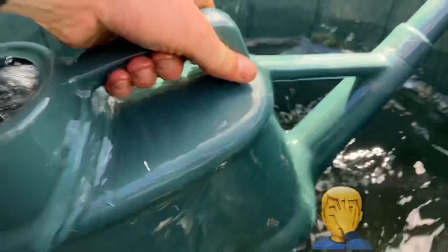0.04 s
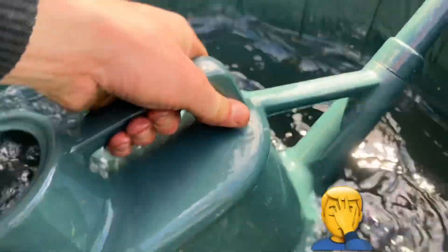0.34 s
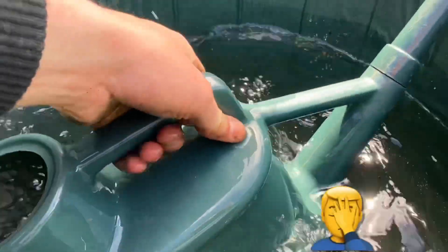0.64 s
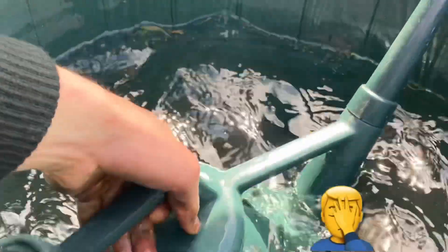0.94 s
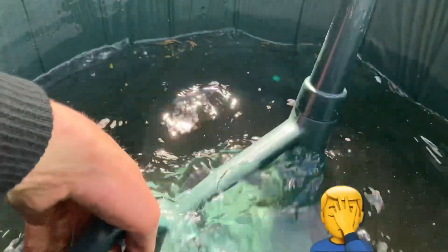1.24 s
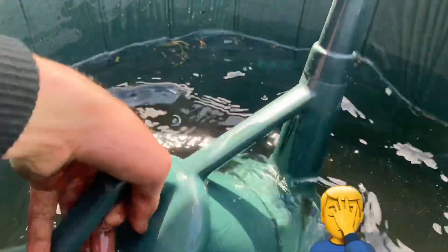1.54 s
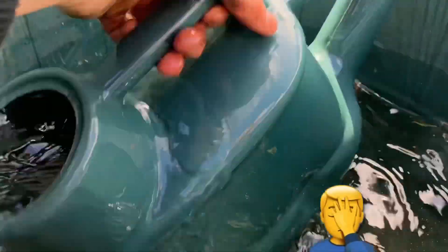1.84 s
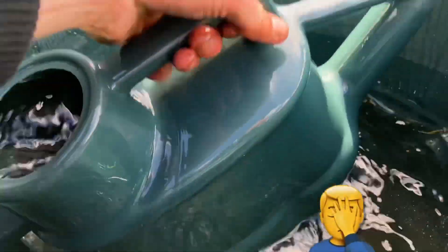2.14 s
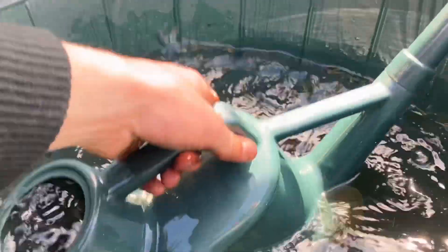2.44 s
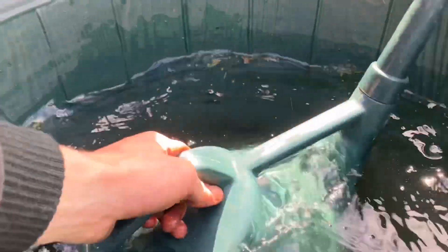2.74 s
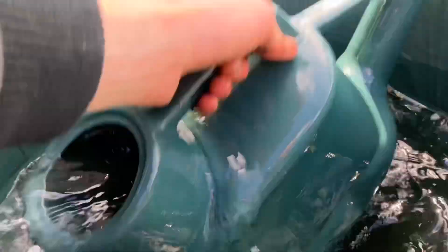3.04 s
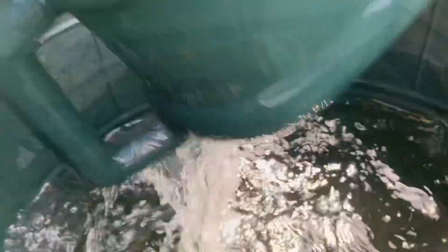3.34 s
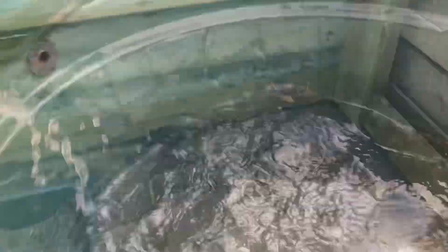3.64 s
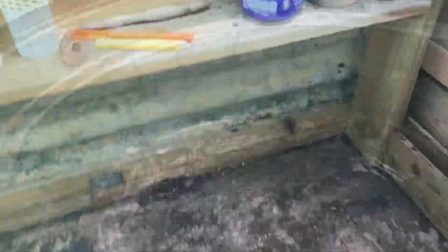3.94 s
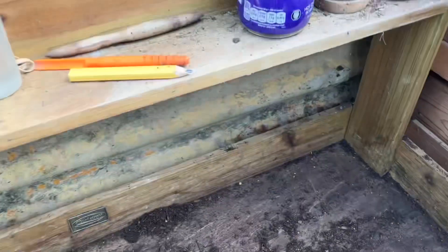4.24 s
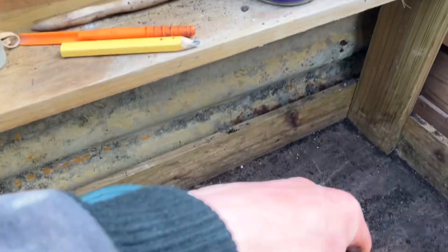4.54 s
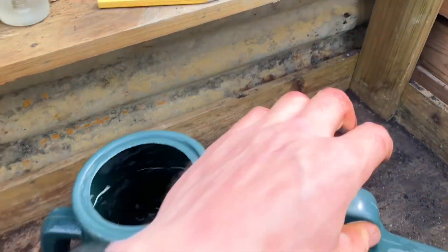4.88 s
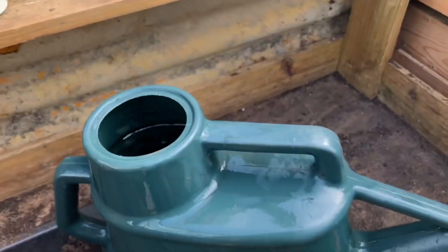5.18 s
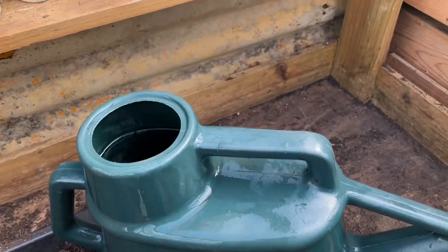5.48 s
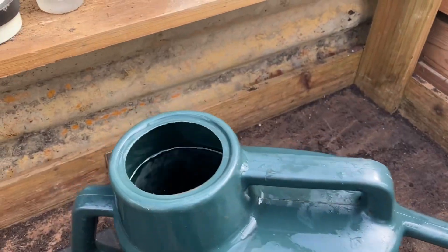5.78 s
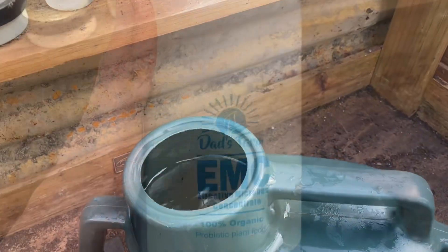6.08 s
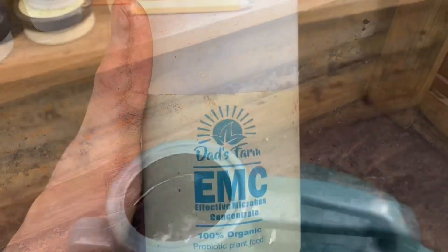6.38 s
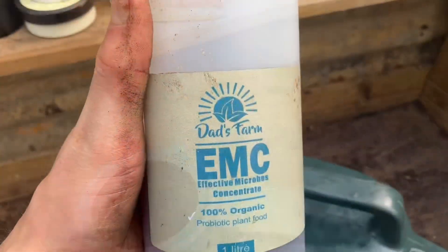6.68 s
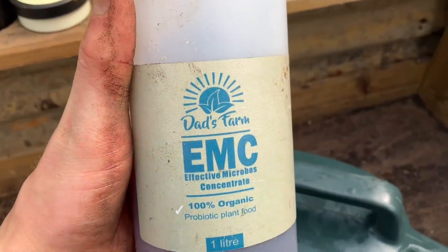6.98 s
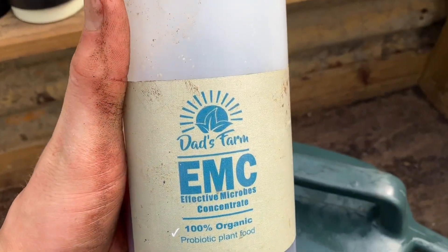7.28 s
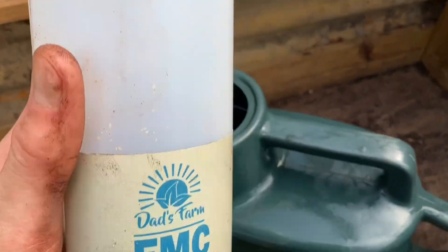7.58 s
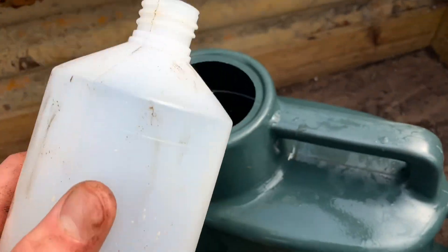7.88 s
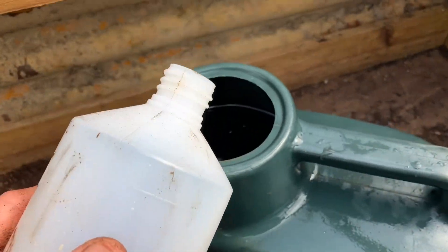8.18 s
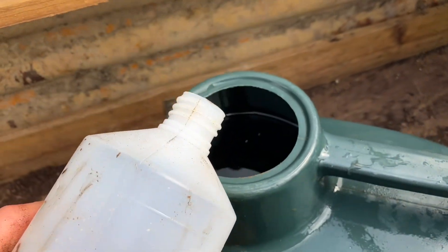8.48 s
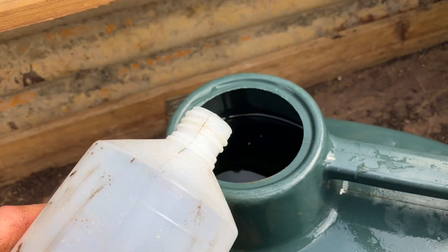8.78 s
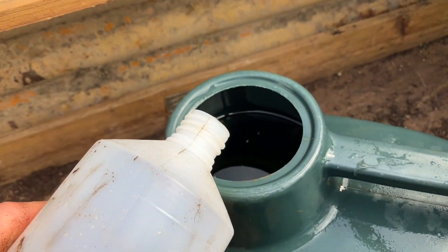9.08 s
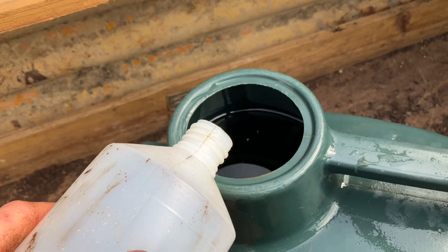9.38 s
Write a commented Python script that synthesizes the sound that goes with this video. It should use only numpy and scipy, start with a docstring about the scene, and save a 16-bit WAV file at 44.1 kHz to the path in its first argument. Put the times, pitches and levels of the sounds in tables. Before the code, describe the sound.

A plastic watering can plunges into a water butt right at the start, close by, with a splash and a deep gulp of air. Water keeps slapping, bubbling and trickling, and drops tick on the plastic. A second strong plunge comes at about 1.7 seconds and a third surge at 3, with more gurgles and sharp drips. The water fades away around 4 seconds. At 4.3 the full can lands on soil with a dull thud and a brief low slop inside. Quieter hollow knocks follow at about 4.8, 5.1 and 5.6, with two tiny ones just after 6, amid hand rubbing and sleeve rustle. The rest is very quiet: a bottle is handled softly around 7.6 and 9 seconds, and distant jackdaws give about six short, very faint calls between 6.8 and 8.5. A low, soft outdoor rumble runs underneath throughout.

```python
"""Water splashes, gulps air and drips as a plastic watering can is dunked three times in a water butt. The full
can thuds onto soil, slops and knocks; a hand and sleeve rub and swish over its plastic. Jackdaws call far off
over a low outdoor rumble; two closely spaced microphone ports pick it all up. Water is ringing bubbles and
noise bursts, the can is damped wall modes, the rustle is tiny slips, and each call is a harmonic stack through
a throat resonance."""
import sys
import numpy as np
from scipy import signal
from scipy.fft import rfft, irfft, next_fast_len
from scipy.io import wavfile
from scipy.ndimage import map_coordinates

SR = 44100
rng = np.random.default_rng(int(sys.argv[2]) if len(sys.argv) > 2 else 0)


def store_pcm(level_fs):
    """Save levels as 16-bit WAV."""
    pcm = np.round(np.clip(level_fs, -1, 1) * 32767).astype(np.int16)
    wavfile.write(sys.argv[1], SR, np.atleast_2d(pcm).T)


N = 419832

# can plunged, nudged, lifted out: (time [s], length [s], relative bubbling [dB], relative spray [dB])
SURGES = [(0.0, 0.31, -26.5, -35.5), (1.741, 0.33, -26.5, -36.5), (2.482, 0.041, -42.5, -52),
          (3.021, 0.27, -29, -35), (3.424, .025, -35.5, -43), (3.516, 0.07, -38, -42),
          (3.757, 0.067, -53, -51.5)]
# spectrum of thrown spray: (frequency [Hz], level [dB])
SPRAY_SPECTRUM = [(500, -39), (2000, -8), (4000, -13.5), (5500, -9), (11000, -2), (16000, -4)]
# spectrum of rubbed plastic: (frequency [Hz], level [dB])
RUB_SPECTRUM = [(100, 0), (350, -10), (430, 1), (530, 1), (700, -5.5), (1600, -10), (8000, -29.5)]
# spectrum of cloth swish and contact ticks: (frequency [Hz], level [dB])
SWISH_SPECTRUM = [(500, -5.5), (2000, 0.5), (12000, -7), (16000, -7)]

DROPLET_LOW_HZ, DROPLET_HIGH_HZ, DROPLET_CYCLES = 2413, 16300, 33
MIST_DB = -9.5  # finest spray, relative to the droplets


def churn(waves):
    """One patch of water heaves, folds in bubbles and throws spray; in lulls it follows the waves."""
    # spectrum of bubbles and foam: (frequency [Hz], level [dB])
    bubbling_spectrum = [(150, -4), (350, -10.5), (700, -5), (2100, -0.5), (3600, -0.5), (7000, -5.5),
                         (12000, -49)]
    # slow waves settle, then the lifted can stirs them: (time [s], level [dB])
    heave_levels = [(1.3, -45), (1.5, -51.5), (2.9, -53), (3.1, -46)]
    _, _, bubbling_levels, spray_levels = np.transpose(SURGES)
    bubbling_db = surge_db(bubbling_levels, fall_db_per_s=131)
    spray_db = surge_db(spray_levels, fall_db_per_s=70.5)
    busy = np.clip((bubbling_db + 45) / 12, 0, 1)  # 0 in a lull, 1 in a surge
    droplets = swarm(200, DROPLET_LOW_HZ, DROPLET_HIGH_HZ, DROPLET_CYCLES,
                     spread_db=5, samples=800, rise=.1)
    clump_db = np.clip(-.3 * (spray_db + 23.5), 0, 6)  # droplets bunch in the lulls
    droplets *= amp(clump_db * (np.minimum(wobble(25), 1.8) - 1.6))
    foam = amp(-8.5) * noise(bubbling_spectrum)
    mist = amp(MIST_DB) * rng.standard_normal(N)
    breaking = amp(2.4 * wobble(35))
    bubbles = filtered(folds(busy), lambda hz: amp(along(bubbling_spectrum, hz)))
    bubbling = breaking * (bubbles + foam) * amp(bubbling_db - 6 + 1.5 * (busy - .5))
    spray = coloured(breaking * (droplets + mist), SPRAY_SPECTRUM) * amp(spray_db - 1)
    slosh = amp(3 * (1 - busy) * (np.minimum(waves, 1) - 1))
    heave_db = np.interp(np.arange(N) / SR, *np.transpose(heave_levels)) + water_fade_db()
    return amp(heave_db) * low_waves() + slosh * (bubbling + spray)


def surge_db(levels_db, fall_db_per_s):
    """Each surge rises, holds and collapses into a run-off that trickles on, then stops."""
    rise_s, runoff_s = .031, 1.28
    t, power = np.arange(N) / SR, 1e-12
    for (start_s, length_s, *_), db in zip(SURGES, levels_db):
        since_s = np.maximum(t - start_s - length_s, 0)
        runoff_db = -15 - 1.5 * since_s - fall_db_per_s * np.maximum(since_s - runoff_s, 0)
        attack = np.exp(np.minimum(t - start_s, 0) / rise_s)
        release = amp(-fall_db_per_s * since_s) + amp(runoff_db)
        power += (amp(db - 1.5) * attack * release) ** 2
    return 10 * np.log10(power) + water_fade_db()


def water_fade_db():
    """The water fades away after the last dunk."""
    start_s, fall_db_per_s = 3.798, 73
    return -fall_db_per_s * np.maximum(np.arange(N) / SR - start_s, 0)


def folds(busy):
    """Each fold of water traps five bubbles of similar size; calm water seldom folds."""
    rate_per_s, calm_share, scatter_s, spread_db = 42, .2, .008, 3.3
    low_hz, high_hz, cycles = 374, 6270, 32
    track, t, energy = np.zeros(N), np.arange(SR // 20) / SR, 0
    count = int(rate_per_s * N / SR)
    draws = zip(rng.random((count, 3)), rng.standard_normal((count, 3, 5, 1)))
    for (when, pitch, chance), (late, detune, size) in draws:
        hz = low_hz * (high_hz / low_hz) ** pitch * np.exp(.25 * detune)
        rings = bubble(np.maximum(t - scatter_s * np.abs(late), 0), hz, cycles / hz, rise=.12)
        fold = (amp(spread_db * size) * rings).sum(axis=0)
        energy += fold @ fold
        if chance < calm_share + busy[int(when * N)]:
            add(track, when * N / SR, fold)
    return track / np.sqrt(energy / N)


def splashes():
    """Slaps and plops land on any of three patches of water; only slaps throw spray."""
    # slaps of water: (time [s], relative level [dB], centre [Hz], relative spray [dB])
    slaps = [(0.071, -10, 906, -19.5), (0.116, -18.5, 3280, -5.5), (0.19, -10, 4500, -8.5),
             (0.425, -13, 1310, -12), (0.541, -18.5, 1290, -36), (0.619, -23, 1070, -20),
             (0.775, -13.5, 2530, -22.5), (0.851, -22, 626, -11.5), (0.97, -19, 727, -17),
             (1.057, -21, 4040, -16.5), (1.14, -25, 4070, -14), (1.826, -8, 1240, -14.5),
             (1.853, -16, 568, -5.5), (2.097, -9, 1940, -18.5), (2.224, -15, 3160, -19),
             (2.277, -20.5, 757, -7), (2.99, -15, 2130, -11), (3.043, -11, 1400, -24.5),
             (3.291, -15.5, 408, -9.5), (3.518, -15.5, 1850, -22), (3.6, -28.5, 2390, 1),
             (3.756, -25, 5100, -3.5)]
    # water closing over air pockets: (time [s], relative level [dB], centre [Hz])
    plops = [(0.0, -7, 683), (0.919, -23.5, 890), (1.185, -16, 436), (1.73, -1.5, 782), (1.765, -10, 1160),
             (2.408, -14.5, 587), (2.653, -19.5, 695), (2.916, -20.5, 1360)]
    patches, t = np.zeros((3, N)), np.arange(SR // 10) / SR
    for start_s, db, centre_hz, spray_db in slaps:
        spray = shower(t, count=70) * decay(t, t60_s=.076) * onset(t, rise_s=.00097)
        patch = patches[rng.integers(3)]
        burst = splash(t, centre_hz, rise_s=.0018, t60_s=.059, q=.81)
        add(patch, start_s, amp(db - 10) * (burst + amp(spray_db + 14) * spray))
    for start_s, db, centre_hz in plops:
        patch = patches[rng.integers(3)]
        add(patch, start_s, amp(db - 9.5) * splash(t, centre_hz, rise_s=.0037, t60_s=.06, q=.7))
    return patches


def splash(t, centre_hz, rise_s, t60_s, q):
    """Water hits water: a hollow burst traps a cluster of bubbles."""
    hollow = unit(resonance(resonance(rng.standard_normal(len(t)), centre_hz, q), centre_hz, q))
    late, detune = rng.standard_normal((2, 8, 1))
    hz = centre_hz * np.exp(.24 * detune)
    cluster = bubble(np.maximum(t - .015 * np.abs(late), 0), hz, t60_s=28 / hz).sum(axis=0)
    return hollow * decay(t, t60_s) * onset(t, rise_s) + .5 * cluster


def shower(t, count):
    """Thrown droplets ping over a little mist; rms 1."""
    when, pitch, strength = rng.random((3, count, 1))
    hz = DROPLET_LOW_HZ * (DROPLET_HIGH_HZ / DROPLET_LOW_HZ) ** pitch
    pings = strength * bubble(np.maximum(t - when * t[-1], 0), hz, DROPLET_CYCLES / hz)
    mist = amp(MIST_DB) * rng.standard_normal(len(t))
    return coloured(unit(pings.sum(axis=0)) + mist, SPRAY_SPECTRUM)


def gulps():
    """Big pockets of air escape from the can and ring."""
    # large bubbles: (time [s], pitch [Hz], level [dB], t60 [s], pitch rise per t60 [ratio])
    air_pockets = [(0.0, 109, -16, 0.22, -0.45), (0.073, 191, -2.5, 0.065, -0.082),
                   (.091, 1204, -13.5, 0.034, 0.078), (.159, 1090, -17.5, .03, 0.55),
                   (.166, 730, -22.5, .07, -.55), (.302, 377, -17.5, 0.062, -0.18),
                   (.342, 994, -23, 0.053, 0.13), (.722, 447, -21, .11, 0.059),
                   (.917, 598, -28.5, 0.14, 0.08), (1.081, 1110, -43, 0.14, 1),
                   (1.186, 2074, -29.5, 0.035, 0.39), (1.2, 188, -12.5, 0.072, -0.26),
                   (1.236, 105, -15.5, 0.095, -0.061), (1.305, 820, -24, 0.15, .25),
                   (1.346, 993, -28, 0.046, .2), (1.377, 385, -29, 0.13, -0.018),
                   (1.434, 1770, -29.5, 0.031, -0.0062), (1.722, 572, -12.5, 0.15, 0),
                   (1.886, 692, -22.5, 0.15, 0.52), (2.077, 274, -16.5, 0.042, 0.38),
                   (2.412, 560, -25.5, 0.071, -0.17), (2.944, 840, -16.5, 0.038, 1),
                   (2.966, 776, -26.5, 0.13, -1.1), (3.061, 1080, -19.5, .05, 0.26),
                   (3.12, 1027, -19, 0.052, 0.84), (3.181, 820, -20.5, .04, .6),
                   (3.298, 400, -15.5, .05, .5), (3.546, 82.6, -23.5, 0.27, 0.082)]
    track, t = np.zeros(N), np.arange(SR // 4) / SR
    for start_s, hz, db, t60_s, rise in air_pockets:
        add(track, start_s, amp(db) * bubble(t, hz, t60_s, rise))
    return track


def drips():
    """Drops strike the plastic with a sharp tick and a brief ring."""
    # drops on the can: (time [s], level [dB], ring [Hz])
    drops = [(.623, -23, 1175), (0.787, -18, 2680), (.818, -27, 2240), (0.971, -21.5, 11860),
             (1.222, -28.5, 2930), (1.338, -27, 7720), (1.703, -19.5, 990), (1.733, -8, 2140),
             (1.764, -13.5, 4280), (2.128, -16, 4830), (2.155, -20, 3850), (2.195, -19, 4920),
             (2.655, -17, 745), (3.056, -17, 3830), (3.146, -5.5, 2924), (3.393, -25, 7260),
             (3.524, -13.5, 2000), (3.783, -25, 7500)]
    track, t = np.zeros(N), np.arange(SR // 4) / SR
    for start_s, db, hz in drops:
        tick = noise(SPRAY_SPECTRUM, len(t)) * decay(t, t60_s=.03) * min(hz / 4500, 1)
        add(track, start_s, amp(db) * (.5 * tick + .8 * bubble(t, hz, t60_s=.022)))
    return track


def knocks():
    """Heavy blows wake the can's low modes, hard ones its high modes; long contact blurs the blow."""
    # blows on the full can: (time [s], level [dB], hardness [dB], contact [s])
    blows = [(4.333, -23.5, -26, 0.018), (4.383, -23.5, -16, 0.0024), (4.456, -31.5, 12, 0.052),
             (4.753, -37.5, 11.5, 0.042), (5.076, -26.5, -46, 0.0014), (5.569, -30.5, -1, 0.0016),
             (6.033, -48.5, -1, 0.0018), (6.191, -40, -9, 0.0011)]
    # modes of the walls and air space: (frequency [Hz], level [dB], t60 before soil damping [s])
    modes = [(73.4, -9.5, 0.67), (155, -2.5, 0.22), (239.6, 3, 0.18), (333.4, -2, 0.29), (553, -5.5, 0.13),
             (705, -5.5, 0.046), (833, -7.5, 0.055), (1495, 0.5, 0.03), (1880, 5.5, 0.0091)]
    heavy_contact_s, soft_contact_s = .0043, .04
    split = .031 * np.array([[-1], [1]])  # uneven walls make each mode a beating pair
    track, t = np.zeros(N), np.arange(SR // 2) / SR
    for start_s, db, hard_db, contact_s in blows:
        weight_db = -20 * np.log10(1 + (heavy_contact_s / contact_s) ** 3)
        tick_db = -9 - 20 * np.log10(1 + (contact_s / soft_contact_s) ** 2)
        force = [(300, weight_db), (520, 0), (800, 0), (1400, hard_db)]
        damping = 1 + .7 * amp(weight_db)  # heavy blows press the can into the soil
        ring = 0
        for hz, mode_db, t60_s in modes:
            envelope = amp(mode_db + along(force, hz) + rng.normal(0, 1)) * decay(t, t60_s / damping)
            pair_hz = hz * (rng.normal(1, .04, (2, 1)) + split)
            ring += envelope * np.sin(2 * np.pi * (pair_hz * t + rng.random((2, 1)))).sum(axis=0)
        grit = amp(weight_db / 2 - 4) * noise(RUB_SPECTRUM, len(t)) * np.exp(-t / (contact_s + .0061))
        tick = amp(tick_db) * noise(SWISH_SPECTRUM, len(t)) * np.exp(-t / (contact_s / 2 + .0048))
        add(track, start_s, amp(db) * (.68 * ring + grit + tick) * onset(t, .12 * contact_s))
    return track


def landing():
    """The can sinks into soil with thuds that sag in pitch as it settles; the water inside slops back."""
    # base meeting the soil: (time [s], relative level [dB], pitch [Hz], t60 [s])
    thuds = [(4.337, -3.5, 287, 0.05), (4.363, -11.5, 88, 0.11)]
    # spectrum of water swinging in the can: (frequency [Hz], level [dB])
    slop_spectrum = [(90, -9.5), (320, -1), (560, -12), (900, -53)]
    track = amp(-39.5) * noise(slop_spectrum) * bell(np.arange(N) / SR, centre_s=4.49, width_s=.095)
    t = np.arange(SR // 4) / SR
    for start_s, db, hz, t60_s in thuds:
        add(track, start_s, amp(db) * bubble(t, hz, t60_s, rise=-.37) * onset(t, rise_s=.018))
    return track


def handling():
    """Skin and cloth drag over plastic in tiny slips; each stroke swells and dies away."""
    # strokes of hand and sleeve: (peak time [s], decay time [s], rub [dB], swish [dB])
    strokes = [(4.161, 0.091, -53.5, -55.5), (4.46, 0.046, -39, -53), (4.583, 0.0057, -46.5, -47.5),
               (4.933, 0.4, -57.5, -62), (5.278, 0.079, -51, -47), (5.517, 0.056, -57.5, -56.5),
               (5.8, 0.15, -80, -52.5), (5.99, 0.17, -93, -58.5), (6.248, 0.097, -72, -55),
               (7.577, 0.083, -61, -65), (7.799, 0.0042, -79, -54.5), (8.966, 0.024, -76.5, -59.5)]
    # spectrum of the hiss of strong strokes: (frequency [Hz], level [dB])
    hiss_spectrum = [(4000, -49), (7000, 2), (11000, 5), (16000, 4)]
    hiss_from_db = -51.5
    t = np.arange(N) / SR
    rub_gain, swish_gain = np.zeros((2, N))
    for peak_s, decay_s, rub_db, swish_db in strokes:
        age = (t - peak_s) / decay_s
        speed = np.exp(-np.where(age < 0, (age / .74) ** 2, age))
        rub_gain += amp(rub_db) * speed
        swish_gain += amp(swish_db) * speed
    slips = swarm(rate_per_s=380, low_hz=127.5, high_hz=3260, cycles=37, spread_db=2.5, samples=1200)
    fibres = noise(SWISH_SPECTRUM) * amp(2.76 * wobble(70))
    hiss = swish_gain / amp(hiss_from_db) * noise(hiss_spectrum)
    rub = coloured(slips + .5 * rng.standard_normal(N), RUB_SPECTRUM)
    return rub_gain * rub + swish_gain * (fibres + hiss)


def jackdaws():
    """An unsteady harmonic stack bends down, shaped by the throat, and breaks into a rasp."""
    # calls: (time [s], length [s], pitch [Hz], relative level [dB], throat resonance [Hz],
    # pitch fall [ratio], closing rasp [dB])
    calls = [(6.788, 0.12, 614.5, -67, 2410, 0.12, -23), (6.906, 0.074, 477, -67.5, 2950, 0.0094, -6),
             (7.855, 0.031, 1115, -73, 2170, 0.18, 4), (8.131, 0.053, 1044, -80, 2140, 0.11, 0),
             (8.256, 0.049, 1064, -68.5, 3050, 0.136, -16), (8.446, 0.036, 1089, -66, 2340, .14, -1)]
    # throat response: (frequency [Hz], gain [dB])
    throat = [(1200, 7), (2900, -4), (4000, -9), (5400, 0), (8000, -3), (11000, -50)]
    arch_per_s, jitter_hz, throat_q = .6, 11, 7
    rasp_hz, rasp_s = 2470, .023
    track, t = np.zeros(N), np.arange(SR // 4) / SR
    for start_s, length_s, start_hz, db, throat_hz, fall, rasp_db in calls:
        progress = np.minimum(t / length_s, 1)
        arch = np.sin(np.pi * progress)
        pitch_hz = start_hz * (1 + arch_per_s * length_s * arch - fall * progress ** 1.5)
        pitch_hz += jitter_hz * wobble(260)[:len(t)]
        phase = 2 * np.pi * np.cumsum(pitch_hz) / SR
        harmonics = np.sin(np.outer(np.arange(1, 10), phase) + 2 * np.pi * rng.random((9, 1)))
        breath, hoarse = rng.standard_normal((2, len(t))) * (1 + np.cos(phase))
        source = unit(harmonics.sum(axis=0)) + .5 * breath
        voice = coloured(resonance(source, throat_hz, throat_q), throat) * np.sqrt(np.abs(arch))
        rasp = unit(resonance(resonance(hoarse, rasp_hz, throat_q), rasp_hz, throat_q / 2))
        rasp *= bell(t, length_s + rasp_s / 2, rasp_s)
        add(track, start_s, amp(db + 11.5) * (voice + amp(rasp_db) * rasp))
    return track


def wide_heave():
    """Deep heaving of the water, unrelated at the two ports, widens the bass."""
    return amp(-56.5 + water_fade_db()) * np.array([low_waves(), low_waves()])


def low_waves():
    """Slow waves heave in short, deep pulses; rms 1."""
    # spectrum of heaving water: (frequency [Hz], level [dB])
    heave_spectrum = [(20, -21.5), (45, -6.5), (80, -6), (180, -0.5), (300, -9), (1000, -38)]
    pulses = swarm(rate_per_s=31, low_hz=36.5, high_hz=365, cycles=6.3, spread_db=2, samples=4000)
    return coloured(pulses, heave_spectrum)


def outdoors():
    """A distant rumble, nearly alike at both ports, wavers and swells a little."""
    # spectrum of the rumble: (frequency [Hz], level [dB])
    rumble_spectrum = [(20, -18), (50, -3), (120, -2.5), (220, -9.5), (340, -9), (450, -13.5), (900, -19),
                       (2500, -28), (4500, -41.5), (10000, -46.5), (15000, -46.5)]
    rumble = ports(noise(rumble_spectrum), tilt_share=.65) + amp(-9) * noise(rumble_spectrum, (2, N))
    swell_db = np.interp(np.arange(N) / SR, [6.4, 7.8, 8.7], [-59, -54.5, -56])
    return amp(swell_db + .9 * wobble(8)) * rumble


def echoes(x, t60_s, delay_s):
    """A dying cloud of reflections, different at each port."""
    # spectrum of echoes off near walls: (frequency [Hz], level [dB])
    wall_spectrum = [(100, -7.5), (500, 3), (2900, 7), (16000, -17.5)]
    t = np.arange(SR // 2) / SR
    tail = noise(wall_spectrum, (2, len(t))) * decay(t, t60_s) * (t > delay_s)
    return signal.fftconvolve(x[None], tail / np.linalg.norm(tail[0]), axes=1)[:, :N]


def ports(x, shift_rad=0, tilt_share=1):
    """Sound reaches two ports with different phase and strength; shift_rad acts on the middle band."""
    # phase between the ports: (frequency [Hz], left lead [rad])
    port_phase = [(0, 0), (900, .6), (2200, 2.2), (3200, 3.8), (4200, 6.2), (5100, 9), (7000, 6.28),
                  (15800, -6.28)]
    # level tilt for the butt, which lies to the left: (frequency [Hz], left minus right [dB])
    port_tilt = [(250, -0.5), (550, 1), (1000, 5), (2000, 5), (4000, 0)]

    def response(hz):
        middle_band = along([(300, 0), (1800, 1), (4500, 1), (7000, .35)], hz)
        lead_rad = np.interp(hz, *np.transpose(port_phase)) + shift_rad * middle_band
        tilt = amp(tilt_share * along(port_tilt, hz) / 2)
        return np.array([tilt, np.exp(-1j * lead_rad) / tilt])
    return filtered(x, response)


def bubble(t, hz, t60_s, rise=.25):
    """A damped ring whose pitch glides by the share rise per t60, as a bubble's does near the surface."""
    return np.sin(2 * np.pi * hz * t * (1 + rise * t / t60_s / 2)) * decay(t, t60_s) * onset(t, 1 / hz)


def swarm(rate_per_s, low_hz, high_hz, cycles, spread_db, samples, rise=.98):
    """Short rings of random time, pitch and strength; rms 1."""
    when, pitch, strength, life = rng.random((int(rate_per_s * N / SR), 4)).T[:, :, None]
    hz = low_hz * (high_hz / low_hz) ** pitch
    gain = amp(-spread_db * np.log(.02 + strength))
    rings = gain * bubble(np.arange(samples) / SR, hz, cycles * (.5 + life) / hz, rise)
    positions = (when * N).astype(int) + np.arange(samples)
    return unit(np.bincount(positions.ravel(), rings.ravel(), N)[:N])


def amp(db):
    """Decibels to gain."""
    return 10 ** (np.asarray(db) / 20)


def unit(x):
    """x at rms 1."""
    return x / np.sqrt(np.mean(x ** 2) + 1e-20)


def onset(t, rise_s):
    """Exponential rise to 1."""
    return 1 - np.exp(-t / rise_s)


def decay(t, t60_s):
    """Fall of 60 dB per t60_s."""
    return amp(-60 * t / t60_s)


def bell(t, centre_s, width_s):
    """Gaussian swell."""
    return np.exp(-((t - centre_s) / width_s) ** 2)


def wobble(knots_per_s):
    """A smooth random curve."""
    knots = rng.standard_normal(int(N * knots_per_s / SR) + 4)
    return map_coordinates(knots, [np.arange(N) * knots_per_s / SR])


def along(points, hz):
    """(frequency [Hz], value) points read on a log axis."""
    knots_hz, values = np.transpose(points)
    return np.interp(np.log(hz + 1), np.log(knots_hz + 1), values)


def filtered(x, response):
    """x through a frequency response."""
    n = x.shape[-1]
    padded = next_fast_len(n + 4096)
    return irfft(rfft(x, padded) * response(np.fft.rfftfreq(padded, 1 / SR)), padded)[..., :n]


def resonance(x, centre_hz, q):
    """x through one resonance."""
    return filtered(x, lambda hz: 1 / (1 + 1j * q * (hz / centre_hz - centre_hz / (hz + 1))))


def coloured(x, spectrum):
    """x shaped by a spectrum; rms 1."""
    return unit(filtered(x, lambda hz: amp(along(spectrum, hz))))


def noise(spectrum, shape=N):
    """Coloured noise; rms 1."""
    return coloured(rng.standard_normal(shape), spectrum)


def add(track, start_s, sound):
    """Mix a sound into the track."""
    part = track[max(round(start_s * SR), 0):][:len(sound)]
    part += sound[:len(part)]


def scene():
    """Three patches of water inside the butt, the can by a wooden wall, birds far away."""
    waves = wobble(9)
    patches = [churn(waves) + patch for patch in splashes()]
    gulps_and_drips = gulps() + drips()
    can = knocks() + landing() + handling()
    birds = jackdaws()
    water = ports(gulps_and_drips)
    pan_db = np.array([[-.4], [.4]])  # outer patches are panned slightly to either side
    for patch, side in zip(patches, (-1, 0, 1)):
        water += ports(patch, shift_rad=side) * amp(side * pan_db)
    near = ports(can, shift_rad=-.87, tilt_share=.65)
    walls = amp(-11) * echoes(sum(patches) + gulps_and_drips, t60_s=.058, delay_s=.004)
    walls += amp(-12) * echoes(can, t60_s=.14, delay_s=.003)
    far = ports(birds, shift_rad=-2, tilt_share=.65) + amp(-15) * echoes(birds, t60_s=.2, delay_s=.01)
    return water + near + walls + far + outdoors() + wide_heave()


def record(dry):
    """A steep low-pass limits the band."""
    top_hz = 15900
    return filtered(dry, lambda hz: .5 - .5 * np.tanh((hz - top_hz) / 70))


dry = scene()
out = record(dry)
store_pcm(out)
```